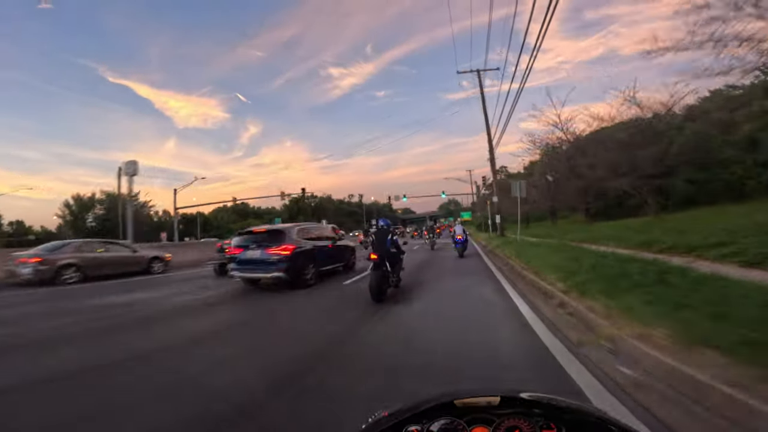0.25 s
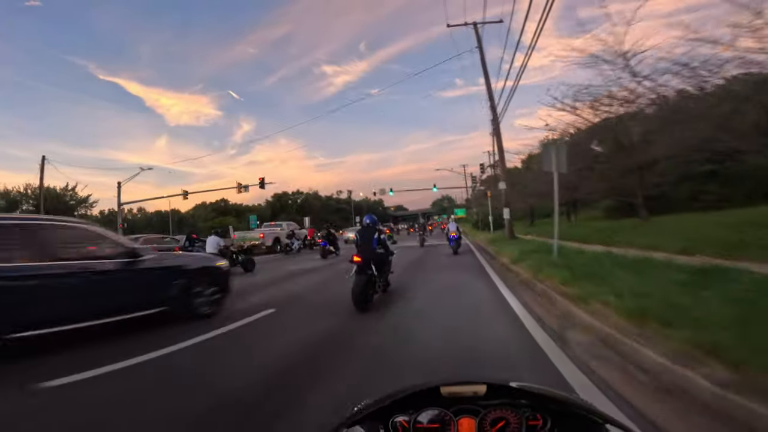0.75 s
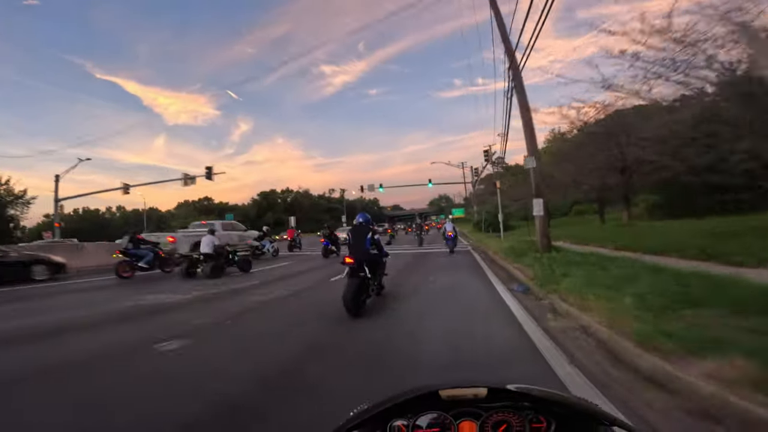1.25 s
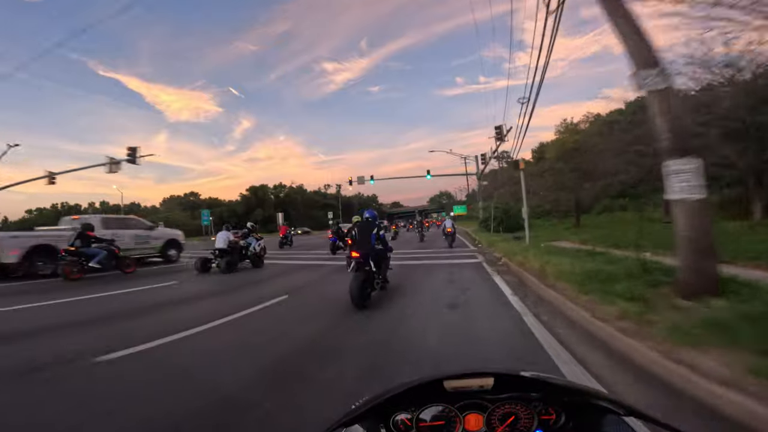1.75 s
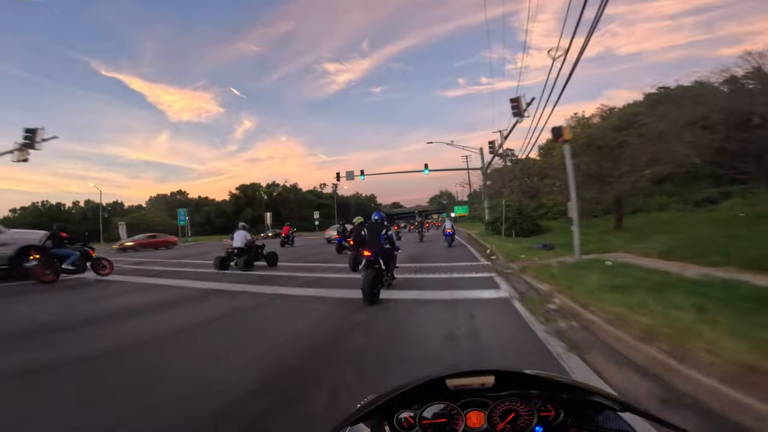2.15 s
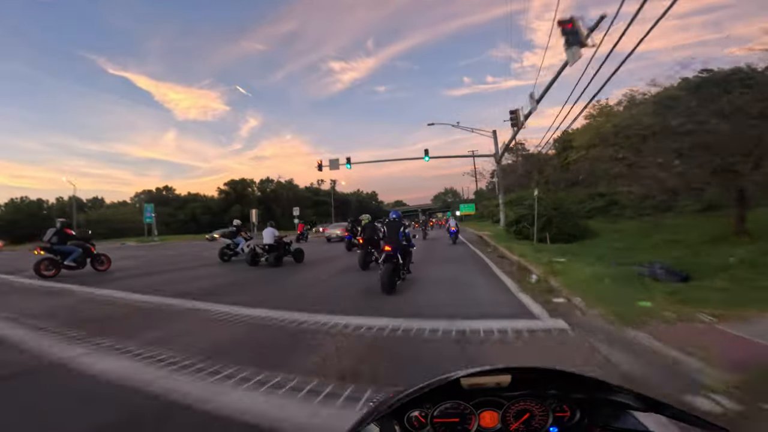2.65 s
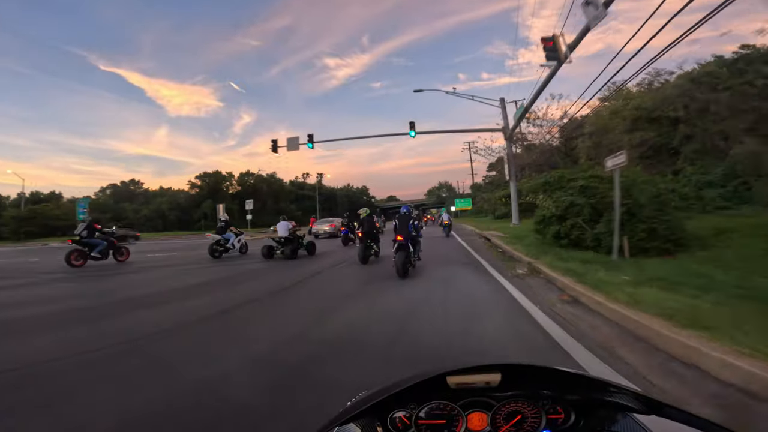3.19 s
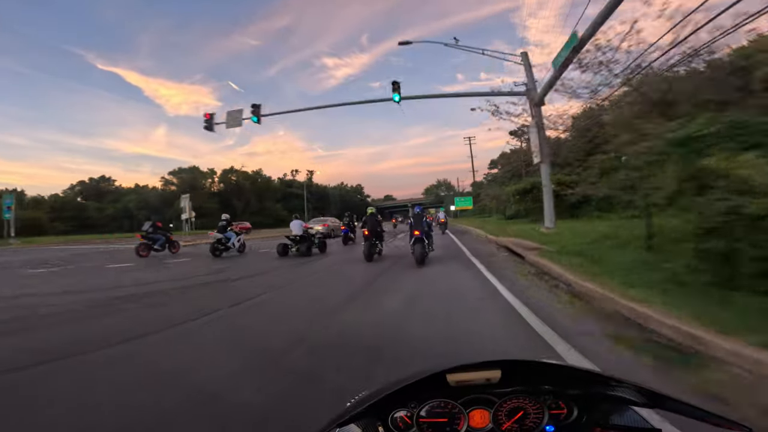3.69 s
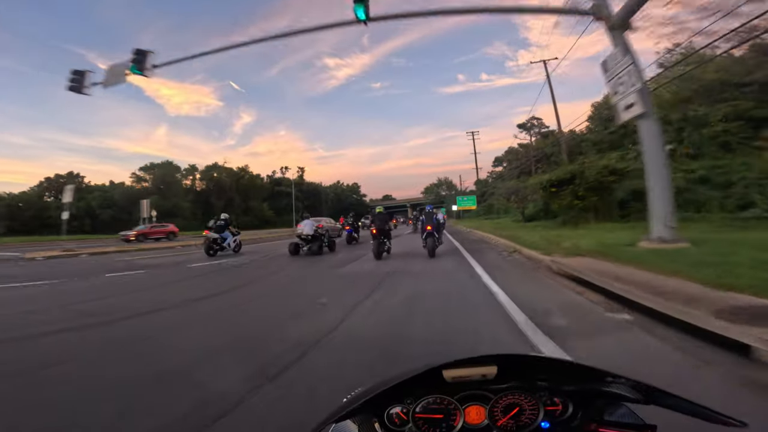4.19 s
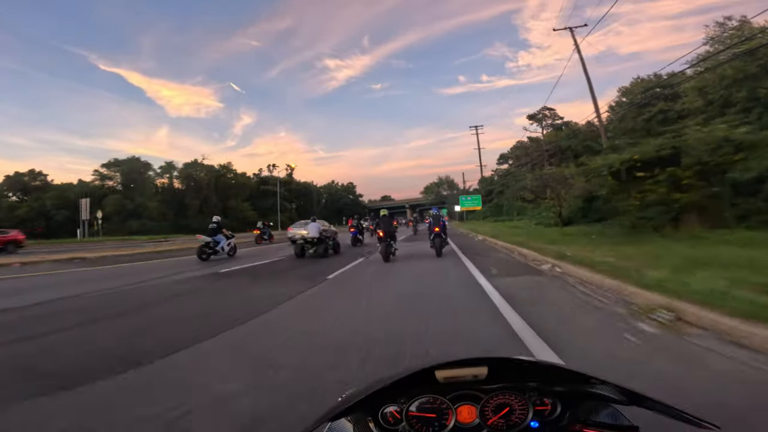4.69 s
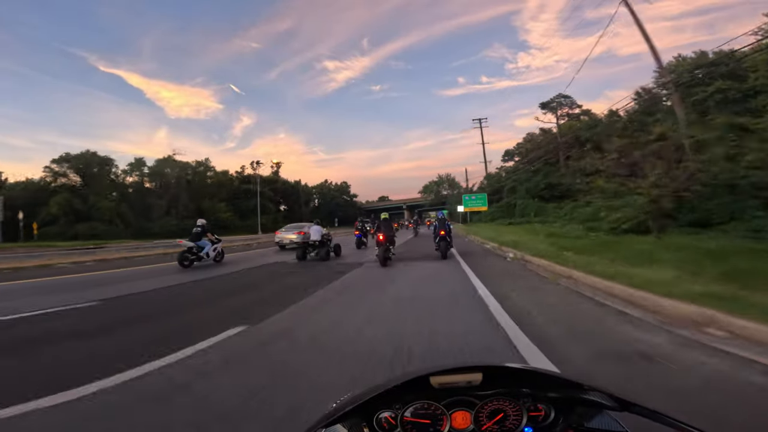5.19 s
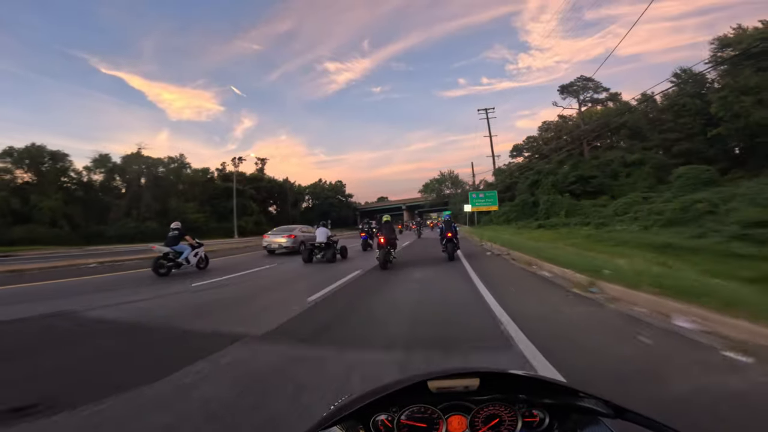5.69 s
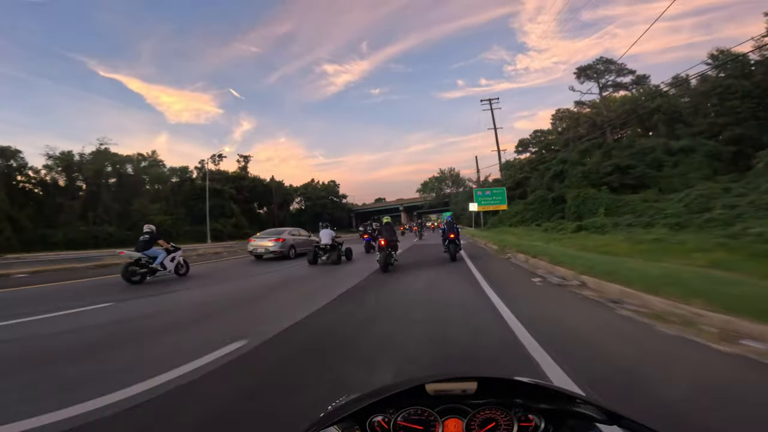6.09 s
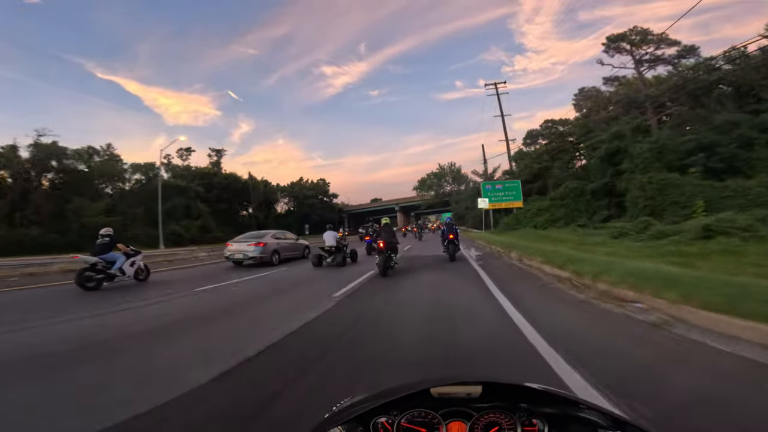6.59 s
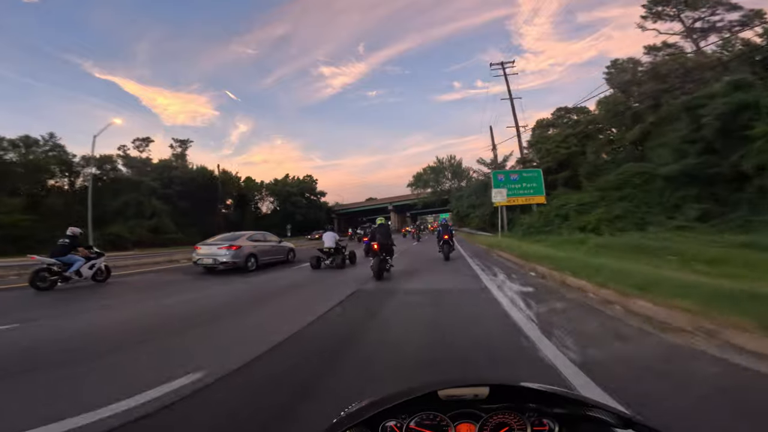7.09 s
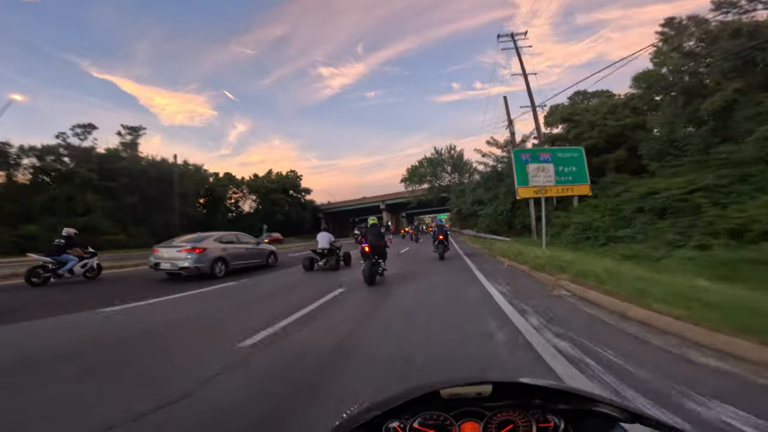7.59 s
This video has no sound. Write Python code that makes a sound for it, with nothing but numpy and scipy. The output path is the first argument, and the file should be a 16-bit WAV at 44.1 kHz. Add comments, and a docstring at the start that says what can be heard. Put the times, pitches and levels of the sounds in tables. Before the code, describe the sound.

A group of motorcycles rides through a road junction, heard from one of the bikes. Its four-cylinder engine growls upward, then settles into a steady hum and whine, with clatter and buzzing plastic panels. A nearby V-twin barks, revs up and pops as its throttle shuts. Another bike cruises alongside, and a last one winds up into a snarl. Wind, tyres and the droning pack continue underneath.

```python
"""At a road junction, a group of motorcycles speeds up, heard from one of the bikes.
The rider's four-cylinder engine hums, clatters and shakes the fairing (the plastic body panels).
A four-cylinder ahead eases off, a V-twin barks and pops, another four cruises alongside and
a last one winds up. Each exhaust note is a stack of tones at multiples of the engine's cycle rate.
Behind them are the rest of the pack, tyres and wind; a limiter holds the loudest peaks down."""
import sys
import numpy as np
from scipy import signal
from scipy.fft import rfft, irfft, next_fast_len
from scipy.io import wavfile
from scipy.ndimage import uniform_filter1d, minimum_filter1d, map_coordinates

SR = 44100
rng = np.random.default_rng(int(sys.argv[2]) if len(sys.argv) > 2 else 0)


def transcribe(signal):
    """Save signal, clipped to [-1, 1], as a 16-bit WAV file at the path in sys.argv[1]."""
    frames = np.atleast_2d(signal).T
    limited = np.clip(frames, -1, 1)
    pcm = np.round(limited * 32767).astype(np.int16)
    wavfile.write(sys.argv[1], SR, pcm)


N = 346185
TIME = np.arange(N) / SR

# Engine speeds; in one cycle every cylinder fires once: time_s, cycle_rate_hz
RIDER_SPEED = [(0,40.5), (.6,42.1), (.9,43.6), (1.4,46.3), (2,51.1), (2.5,55), (2.7,54), (3,53.8),
               (3.6,52.9), (4.1,53.15), (4.7,53.6), (5.5,55.45), (6.1,56.6), (7,55.9), (7.5,55.55),
               (7.85,55.7)]
LEAD_SPEED = [(0,30.5), (.14,30), (.27,31.5), (.5,30.5), (1,29), (1.4,27.6), (1.6,28.2), (1.78,30.8)]
TWIN_SPEED = [(1.88,28), (2,30.4), (2.15,32.1), (2.3,31.5), (2.5,27.1), (2.65,28.1), (3,31.85), (3.5,37.35),
              (4.03,42.9), (4.22,40.85), (4.55,36.4)]
CRUISER_SPEED = [(4.4,32.8), (5,34), (5.7,35.05), (6.3,36.05), (7,36.85), (7.85,37.4)]
REVVING_SPEED = [(5.9,33.2), (6.2,34.7), (6.5,36.7), (6.7,37.35), (7,39.75), (7.25,42.5), (7.5,45.5),
                 (7.85,50.2)]
# How strongly each part shakes or sounds: time_s, level_db
RIDER_VIBRATION = [(0,2), (.6,-11), (.9,1.5), (1.4,-2), (2,0), (2.5,-1), (2.9,-9), (3.6,-11.5), (4.6,-2.5),
                   (4.8,1), (5.6,3.5), (5.8,1.5), (6.2,-0.5), (7,-1.5), (7.85,-9)]
CASING_LEVEL = [(0,-58.5), (3.4,-57), (3.9,-43.5), (4.6,-52), (4.8,-46), (5.62,-44), (5.76,-49.5),
                (6.5,-53.5), (7.85,-46.5)]
TWIN_THROTTLE = [(1.88,-5), (2,-2.5), (2.15,0), (2.42,-2.5), (2.8,-1.5), (3.2,0.5), (3.6,0.5), (4.03,0.5),
                 (4.1,-19), (4.26,-1), (4.54,-3.5), (4.72,-21)]
REVVING_LEVEL = [(5.95,-6), (6.3,-3), (6.6,-1.5), (7,1), (7.3,3), (7.85,1.5)]

# The rider's exhaust tones ("orders"): cycle_rate_multiple, pulling_db, cruising_db
RIDER_ORDERS = [(2,-26,-23.5), (3,-28,-27.5), (4,-22,-21.5), (5,-19,-23), (6,-28,-26), (7,-26.5,-31.5),
                (8,-25.5,-33), (9,-28,-39.5)]
# Tones of the rider's whine and of the other exhausts: cycle_rate_multiple, level_db
WHINE_ORDERS = [(12,-37.5), (13,-34)]
LEAD_ORDERS = [(4,-17), (8,-30), (12,-37.5), (16,-33)]
TWIN_ORDERS = [(2,-31), (3,-22.5), (5,-20.5), (6,-22), (8,-22.5), (9,-31), (10,-25.5), (11,-23.5),
               (12,-30.5), (13,-29.5), (14,-29)]
CRUISER_ORDERS = [(4,-25.5), (8,-26), (9,-28.5), (12,-27), (16,-30)]
REVVING_ORDERS = [(4,-18.5), (8,-22.5), (12,-18)]
# The boom that lifts or lowers exhaust tones as their pitch moves: pitch_hz, gain_db
EXHAUST_BOOM = [(80,-3.5), (120,-0.5), (170,0), (220,1.5), (265,-2), (330,0), (410,4), (460,0), (530,-8),
                (600,-14)]

# Tone colours of the rider's engine: pitch_hz, gain_db
GROWL_TONE = [(300,-18), (405,20.5), (440,17.5), (510,-0.5), (600,9), (660,9.5), (740,4), (825,8.5),
              (900,-1.5), (1050,1), (1160,-3.5), (1300,-15), (2100,-16.5), (2700,-29.5), (3300,-36.5)]
WHINE_TONE = [(280,-30), (380,2), (500,5.5), (600,-1), (700,7.5), (790,-10), (1000,-14.5), (1600,-27.5),
              (2050,-21), (2190,-13), (2600,-28.5), (3300,-40)]
CLATTER_TONE = [(700,-31), (1300,-5.5), (1850,5.5), (2200,1), (2600,-4.5), (3000,-12), (3900,-10.5),
                (5200,-17.5), (8000,-37.5)]
CASING_TONE = [(1900,-32), (2080,-14), (2160,3.5), (2240,-5), (2300,-2), (2380,0), (2490,-14), (2580,-5),
               (2780,-32)]
# Tone colours of the shaking fairing: pitch_hz, gain_db
BUZZ_TONE = [(3500, -26.5), (5200, -6.5), (6000, -8.5), (6800, 1.5), (7600, -6.5), (8500, -9.5), (9400, -9),
             (11000, -24), (15000, -29)]
SIZZLE_TONE = [(7000, -23.5), (9500, -1.5), (11700, 2.5), (12600, -4.5), (13500, -2), (15500, -6.5)]
GRIT_TONE = [(1, 7), (250, 4), (500, -11.5), (1200, -36)]
TICK_TONE = [(2500, -12), (7000, 6), (11000, -4), (15500, -18)]
# Tone colours of the wind, the pack, the road and the hisses: pitch_hz, gain_db
WIND_TONE = [(12, -32.5), (20, -2), (70, -3.5), (110, -9.5), (140, -29.5), (240, -120)]
DRONE_TONE = [(60, -29.5), (100, -1.5), (150, -1), (210, -2.5), (290, 0), (410, -4), (490, -7.5),
              (620, -19.5), (800, -26.5), (1100, -41.5), (2000, -56)]
ROAD_TONE = [(300, -19.5), (600, 8), (900, 1.5), (1200, -4), (1600, -8.5), (2400, -24.5), (3200, -27),
             (6000, -59)]
HISS_TONE = [(1000, -27.5), (1500, 12.5), (2500, 9), (3200, -1), (3900, 2), (4400, -1.5), (5200, 1.5),
             (6200, -4.5), (8000, -10.5), (11000, -16), (15500, -28)]
SPURT_TONE = [(8500,-22), (10500,-2), (13000,0), (15500,-1)]
# Tone colours of the V-twin's exhaust: pitch_hz, gain_db
POP_TONE = [(400,-9.5), (600,1.5), (850,6.5), (1250,5), (1520,-4.5), (1850,-9), (2450,-6.5), (3100,-17.5),
            (5000,-28), (8000,-39)]
BARK_TONE = [(330,-17.5), (450,10.5), (560,4), (680,8), (800,1.5), (950,-2), (1150,-3), (1500,-11.5),
             (1850,-21.5), (2400,-17.5), (3100,-17), (5000,-37)]
GAS_TONE = [(700,-8), (1000,2), (1270,3), (1430,10), (1660,9), (1820,-5), (2350,-2), (3100,-14), (5000,-36)]
RASP_TONE = [(2000, -21), (3200, 3), (4400, 0.5), (5400, 6.5), (6500, -4), (8200, -12), (9700, -9.5),
             (11000, -28), (15000, -45)]
# Tone colours of the four that winds up: pitch_hz, gain_db
SNARL_TONE = [(550,-28), (760,3.5), (900,8), (1000,3), (1110,9), (1280,-10.5), (1450,-7.5), (1700,-14),
              (2000,-15.5), (3000,-22.5)]
BRASSY_TONE = [(1100,-14), (1300,4), (1500,1), (1720,4), (1900,-9), (2400,-15), (2900,-26)]

# Background loudness: time_s, wind_db, road_db, hiss_db, drone_db
BACKGROUND_LEVELS = [(0,-22.5,-30,-46,-15), (.6,-28,-29,-44,-15.5), (2,-22.5,-34.5,-47,-15.5),
                     (3.5,-22,-30,-49,-16), (4.2,-25.5,-39,-48,-17), (5,-24.5,-33.5,-45,-14.5),
                     (6.5,-25.5,-34.5,-44.5,-17.5), (7.85,-25,-39,-43,-16.5)]
# Brief gliding engine tones: start_s, end_s, start_hz, end_hz, level_db
SWELLS = [(-.3,1,1126,1164,-41), (0.547,1.048,495,481,-27), (.55,1.045,425,436,-25.5),
          (0.555,1.049,803,815,-34.5), (1.049,1.6,816,850,-34.5), (1.096,1.55,436,461,-19.5),
          (1.886,2.45,432,400,-35), (2.507,2.954,707,700,-32), (3.903,5.295,438.6,491,-28.5),
          (4.45,4.853,399.5,404,-21), (4.994,5.595,230.7,158.5,-20.5), (5.105,5.366,386,379.4,-17),
          (5.403,6.106,161.5,177.7,-22.5), (6.197,6.799,860,882,-37.5)]
# Spells of loose panels ringing: start_s, end_s, pitch_hz, level_db
RATTLES = [(0.851, 1.007, 7600, -65), (1.1, 1.7, 7740, -60), (1.637, 2.501, 6800, -56),
           (2.441, 2.568, 6370, -51), (4.752, 5.85, 6970, -54), (7.096, 8.006, 9394, -60.5)]
# Harder shaking of the fairing: middle_s, half_length_s, added_buzz_db, added_sizzle_db
JOLTS = [(2.15,0.39,11.5,2), (4.15,0.095,10,4), (5.6,0.11,11.5,3), (7.5,1,5.5,8.5)]
# Plastic ticks, and the V-twin's cracks and pops: time_s, level_db
TICKS = [(1.7246,-36), (1.8068,-37), (2.0439,-42), (2.1033,-47.5), (2.1598,-39), (2.2741,-38), (2.3477,-40),
         (5.3812,-40), (5.525,-47.5), (5.5787,-42)]
POPS = [(1.806, -19), (1.9056, -25), (1.947, -24), (2.042, -23), (2.103, -27), (2.274, -17), (2.3246, -25),
        (2.389, -19), (2.46, -17), (2.5825, -24), (2.688, -19), (2.7583, -16), (2.976, -22), (3.188, -21),
        (4.282, -19), (4.3064, -21), (4.41, -18), (4.4788, -28), (4.489, -15.5), (4.6263, -15),
        (4.654, -17), (4.6707, -20)]
# Spurts of high hiss: middle_s, half_length_s, level_db
SPURTS = [(4.09,.016,-60), (4.15,.028,-62)]
# Surges of the snarl: middle_s, half_length_s, added_snarl_db, brassy_db
SURGES = [(7.02,0.09,6.5,-53), (7.65,0.14,-2.5,-38)]

CRUISE_S, SETTLE_S = 2.7, 0.36  # when the rider stops speeding up, and how long that takes
WHINE_S, WHINE_RISE_S = 2.78, 2  # when the whine comes through, and how long that takes
GROWL_DB, GROWL_DROP_DB = -26.5, 11  # growl while pulling; how far it drops at a cruise
WHINE_DB, WHINE_DROP_DB = -31, 13  # whine at a cruise; how much quieter it is before
HUM_FOLLOWS, WHINE_FOLLOWS, FAIRING_FOLLOWS = 0.37, 0.12, 0.76  # dB per dB of vibration
CLATTER_DB, BUZZ_DB, SIZZLE_DB = -43, -62, -70
TWIN_HARSH_HZ = 33.7  # the V-twin turns harsh above this cycle rate
TWIN_SHUT_S, SHUT_TAKES_S = 4.04, 0.03  # when and how fast its throttle snaps shut
BARK_DB, THROB_FOLLOWS = -25.5, 0.18  # pipe pulses; dB of throb per dB of throttle
GAS_DB, GAS_DB_PER_HZ, GAS_DROP_DB = -41, 1, 4  # at low revs; growth with revs; drop once shut
RASP_DB, RASP_DB_PER_HZ, RASP_DROP_DB = -55, 0.69, 22  # likewise
SNARL_MID_HZ, SNARL_DB, SNARL_DB_PER_HZ = 39, -40.5, 0.93  # a cycle rate; snarl there; growth with revs


def amp(db):
    """Turn decibels into a multiplier."""
    return 10 ** (np.asarray(db) / 20)


def unit(x):
    """Scale x to an average strength (rms) of 1."""
    return x / np.sqrt(np.mean(x ** 2) + 1e-20)


def noise():
    """White noise: an even hiss."""
    return rng.standard_normal(N)


def curves(rows):
    """Join a table's points with lines: one curve for each column after the time."""
    times, *columns = np.transpose(rows)
    return [np.interp(TIME, times, column) for column in columns]


def ramp(at, length):
    """Rise from 0 to 1 around a moment."""
    return np.clip((TIME - at) / length + .5, 0, 1)


def arch(start, end):
    """Rise from 0 to 1 and fall back between two moments."""
    return np.sin(np.pi * np.clip((TIME - start) / (end - start), 0, 1))


def humps(rows):
    """A bell shape for each (middle, half length, heights) row: one curve per height column."""
    return sum(np.outer(heights, np.exp(-((TIME - s) / half) ** 2)) for s, half, *heights in rows)


def present(rows, fade_s):
    """1 from a table's first time to its last, fading to 0 outside."""
    start, end = rows[0][0], rows[-1][0]
    return np.interp(TIME, [start - fade_s, start, end, end + fade_s], [0, 1, 1, 0])


def wobble(rate):
    """A smooth random curve through `rate` new values a second."""
    knots = rng.standard_normal(int(N * rate / SR) + 4)
    coarse = TIME[::32]
    return np.interp(TIME, coarse, map_coordinates(knots, [coarse * rate], mode="nearest"))


def colour(x, points):
    """Filter x to a tone colour, then scale it to strength 1."""
    size = next_fast_len(N + 8192)
    hz, db = np.transpose(points)
    log_hz = np.log(np.fft.rfftfreq(size, 1 / SR) + 1)
    gain = amp(np.interp(log_hz, np.log(hz), db, left=-120, right=-120))
    return unit(irfft(rfft(x, size) * gain, size)[:N])


def cycles(rate, waver):
    """Count the engine cycles run so far, at a slightly unsteady speed."""
    return np.cumsum(rate * (1 + waver * wobble(12))) / SR


def tone(turns, order, db, rough):
    """One engine tone; uneven burning shakes its loudness and timing."""
    phase = 2 * np.pi * (order * turns + rng.random()) + rough * wobble(35)
    return np.sqrt(2) * amp(db) * (1 + rough * wobble(35)) * np.sin(phase)


def bursts(turns, rate, offset, decay_s, scatter_db):
    """A loudness curve that jumps once a cycle, each time to a new height, and dies away."""
    whole, part = np.divmod(turns + 1 - offset, 1)
    heights = amp(scatter_db * np.clip(rng.standard_normal(2048), -2, 2))
    return heights[whole.astype(int) % len(heights)] * np.exp(-part / rate / decay_s)


def rises(x):
    """Keep only the upward steps of x, as sharp clicks."""
    return np.maximum(np.diff(x, prepend=x[0]), 0)


def repeating(turns, count, jitter):
    """The same ragged pressure wave in every cycle, made of `count` nearly equal tones."""
    tones = amp(rng.normal(0, 1.5, count)) * np.exp(2j * np.pi * rng.random(count))
    wave = irfft(np.append(0, tones), 4096)
    place = (turns + jitter * wobble(60)) % 1
    return unit(np.interp(place, np.linspace(0, 1, len(wave)), wave))


def exhaust(turns, rate, orders, rough):
    """An engine's low tones, each swelling as its pitch passes through the boom."""
    boom_hz, boom_db = np.transpose(EXHAUST_BOOM)
    out = np.zeros(N)
    for order, db in orders:
        lift_db = np.interp(order * rate, boom_hz, boom_db)
        drift_db = 0.7 * wobble(3.15)  # the bikes shift about
        out += tone(turns, round(order), db + lift_db + drift_db, rough)
    return out


def rider():
    """The rider's engine hums and growls, then whines; valves clatter and the fairing buzzes."""
    rate, vibration_db = curves(RIDER_SPEED) + curves(RIDER_VIBRATION)
    cruise = ramp(CRUISE_S, SETTLE_S)
    turns = cycles(rate, waver=0.001002)
    orders = [(k, pulling + cruise * (cruising - pulling)) for k, pulling, cruising in RIDER_ORDERS]
    hum = amp(HUM_FOLLOWS * vibration_db) * exhaust(turns, rate, orders, rough=0.1)
    upper = growl_and_whine(turns, cruise, vibration_db)
    knock = bursts(turns, rate, 0, decay_s=.001, scatter_db=1.5)
    rebound = .85 - .5 * cruise  # the second knock is stronger while pulling
    knock += rebound * bursts(turns, rate, 1 / 4, decay_s=.0015, scatter_db=2)
    valves = repeating(turns, count=140, jitter=0.00037) + 0.75 * noise()  # much alike in every cycle
    clatter = amp(CLATTER_DB + vibration_db) * colour((knock + 0.1) * valves, CLATTER_TONE)
    shake = uniform_filter1d(knock, size=45)  # plastic answers with a softer edge
    return hum + upper + clatter + fairing(shake, vibration_db) + casing(turns, rate) + rattles(shake)


def growl_and_whine(turns, cruise, vibration_db):
    """The rider's higher engine tones: a growl while pulling gives way to a whine at a cruise."""
    wave = repeating(turns, count=80, jitter=.0025)
    # an echo off the road, its path shifting, makes the overtones come and go
    echo = np.interp(TIME - .006 - .0005 * wobble(3), TIME, wave)
    growl_db = GROWL_DB - GROWL_DROP_DB * cruise + 1.2 * wobble(5.3)
    growl = amp(growl_db) * colour(wave + .7 * echo, GROWL_TONE)
    follow_db = WHINE_FOLLOWS * vibration_db
    whine = amp(WHINE_DB) * colour(wave, WHINE_TONE)
    for order, db in WHINE_ORDERS:
        whine += tone(turns, round(order), db + follow_db + 2.32 * wobble(4), rough=0.29)
    drop_db = WHINE_DROP_DB * (1 - ramp(WHINE_S, WHINE_RISE_S))
    return growl + amp(follow_db - drop_db + 0.93 * wobble(7.7)) * whine


def fairing(shake, vibration_db):
    """The plastic panels buzz and sizzle as the engine's knocks shake them."""
    buzz_db, sizzle_db = humps(JOLTS) + FAIRING_FOLLOWS * vibration_db + 1.9 * wobble(4.3)
    buzz = amp(BUZZ_DB + buzz_db) * colour((shake + .04) * noise(), BUZZ_TONE)
    sizzle = amp(SIZZLE_DB + sizzle_db) * colour((shake + .12) * noise(), SIZZLE_TONE)
    return buzz + sizzle


def casing(turns, rate):
    """Valve parts knock and scrape on the engine casing once a cycle; its ringing blurs into a whine."""
    level_db, = curves(CASING_LEVEL)
    blows = bursts(turns, rate, 0, decay_s=0.0058, scatter_db=1.5)
    scrape = .6 * unit((blows + .2) * noise())
    return amp(level_db + 1.5 * wobble(9)) * colour(unit(rises(blows)) + scrape, CASING_TONE)


def lead_four():
    """A four-cylinder ahead drones as its throttle closes."""
    rate, = curves(LEAD_SPEED)
    turns = cycles(rate, waver=0.0014)
    return present(LEAD_SPEED, fade_s=0.11) * exhaust(turns, rate, LEAD_ORDERS, rough=0.091)


def pack(count):
    """Farther engines, each firing at its own drifting speed, blend into a drone."""
    firings = np.zeros(N)
    for _ in range(count):
        rate = rng.uniform(30, 55) * np.exp(.09 * wobble(.8))
        turns = cycles(rate, waver=0.00408)
        for cylinder in range(4):
            puff = bursts(turns, rate, cylinder / 4, decay_s=.002, scatter_db=5.0)
            firings += rng.uniform(0.066, 1) * rises(puff)
    return colour(unit(firings) + .5 * noise(), DRONE_TONE)


def surroundings():
    """Wind on the microphone, the pack's drone, and the roar and hiss of tyres and air."""
    wind_db, road_db, hiss_db, drone_db = curves(BACKGROUND_LEVELS)
    wind = amp(wind_db + 1.8 * wobble(8.8)) * colour(noise(), WIND_TONE)
    road = amp(road_db + 1.4 * wobble(12)) * colour(noise(), ROAD_TONE)
    hiss = amp(hiss_db + 1.4 * wobble(7.9)) * colour(noise(), HISS_TONE)
    return wind + amp(drone_db) * pack(count=5) + road + hiss


def swells():
    """Gliding engine tones stand out for a moment, from the rider's bike or others."""
    out = np.zeros(N)
    for start, end, from_hz, to_hz, db in SWELLS:
        turns = cycles(np.interp(TIME, [start, end], [from_hz, to_hz]), waver=0.00473)
        out += arch(start, end) * tone(turns, 1, db, rough=0.065)
    return out


def rattles(shake):
    """Loose panels, struck in every engine cycle, ring in spells around one high pitch each."""
    grit = colour(shake * noise(), GRIT_TONE)
    out = np.zeros(N)
    for start, end, hz, db in RATTLES:
        spell = np.sqrt(np.abs(arch(start, end)))
        out += amp(db) * spell * grit * np.sin(2 * np.pi * hz * TIME)
    return out


def ticks(trim_db=-1, decay_s=0.0012):
    """Single hard taps in the fairing, each a tiny burst of bright noise."""
    loudness = np.zeros(N)
    t = np.arange(SR // 100) / SR
    for s, db in TICKS:
        loudness[round(s * SR):][:len(t)] += amp(db + trim_db) * np.exp(-t / decay_s)
    return loudness * colour(noise(), TICK_TONE)


def pops(trim_db=-3, decay_s=0.0036):
    """The V-twin's pipe cracks: hard firings as it pulls, then pops once the throttle shuts."""
    loudness = np.zeros(N)
    for s, db in POPS:
        loudness += amp(db + trim_db) * ramp(s, .0012) * np.exp(-np.abs(TIME - s) / decay_s)
    return loudness * colour(noise(), POP_TONE)


def v_twin():
    """Two cylinders fire at uneven gaps, each with a bark and a puff of gas, harsher as revs climb."""
    rate, throttle_db = curves(TWIN_SPEED) + curves(TWIN_THROTTLE)
    turns = cycles(rate, waver=0.00069)
    extra_hz = np.maximum(rate - TWIN_HARSH_HZ, 0)
    shut = ramp(TWIN_SHUT_S, SHUT_TAKES_S)
    throb = amp(THROB_FOLLOWS * throttle_db) * exhaust(turns, rate, TWIN_ORDERS, rough=0.04)
    fired = turns + 0.0025 * wobble(70)  # no two firings are timed alike
    puffs = 0.8 * bursts(fired, rate, 0, decay_s=.0028, scatter_db=1)
    puffs += bursts(fired, rate, 3 / 8, decay_s=.0024, scatter_db=1)
    # the pipe smears each pulse into a 5 ms falling sweep
    sweep = signal.chirp(np.arange(SR // 200) / SR, 3000, 1 / 200, 200, "logarithmic")
    bark = amp(BARK_DB) * colour(signal.fftconvolve(rises(puffs), sweep)[:N], BARK_TONE)
    flow = repeating(turns, count=120, jitter=.0008) + .7 * noise()
    gas = amp(GAS_DB + GAS_DB_PER_HZ * extra_hz - GAS_DROP_DB * shut) * colour(puffs * flow, GAS_TONE)
    rasp_db = RASP_DB + RASP_DB_PER_HZ * extra_hz - RASP_DROP_DB * shut
    rasp = amp(rasp_db) * colour(puffs * noise(), RASP_TONE)
    return present(TWIN_THROTTLE, fade_s=0.058) * (throb + amp(throttle_db) * (bark + gas + rasp))


def high_hiss():
    """A brief, very high hiss in two spurts."""
    spurts, = humps([(s, half, amp(db)) for s, half, db in SPURTS])
    return spurts * colour(noise(), SPURT_TONE)


def cruising_four():
    """A four-cylinder alongside gains speed gently in a high gear."""
    rate, = curves(CRUISER_SPEED)
    turns = cycles(rate, waver=0.0016)
    return present(CRUISER_SPEED, fade_s=0.26) * exhaust(turns, rate, CRUISER_ORDERS, rough=0.12)


def revving_four():
    """Another four-cylinder winds up into a ragged snarl that turns brassy as it surges."""
    rate, level_db = curves(REVVING_SPEED) + curves(REVVING_LEVEL)
    turns = cycles(rate, waver=0.00289)
    note = amp(level_db) * exhaust(turns, rate, REVVING_ORDERS, rough=0.26)
    surge_db, brass = humps([(s, half, db, amp(brassy_db)) for s, half, db, brassy_db in SURGES])
    snarl_db = SNARL_DB + level_db + SNARL_DB_PER_HZ * (rate - SNARL_MID_HZ) + surge_db
    # one wave each firing, and a weaker one each cycle from the unequal cylinders
    waves = repeating(4 * turns, count=18, jitter=.015) + .65 * repeating(turns, count=72, jitter=.004)
    snarl = amp(snarl_db + 2.3 * wobble(22)) * colour(waves, SNARL_TONE)
    return present(REVVING_LEVEL, fade_s=0.2) * (note + snarl + brass * colour(waves, BRASSY_TONE))


def scene():
    """All the engines, the shaking fairing, the road and the wind at one microphone."""
    near = rider() + ticks() + high_hiss() + v_twin() + pops()
    return (near + lead_four() + cruising_four() + revving_four() + swells() + surroundings())[None]


def record(dry, ceiling=0.91, cutoff_hz=16300):
    """A fast limiter turns the peaks down, the end fades quickly and the highest treble is cut."""
    needed_gain = np.minimum(1, ceiling / (np.abs(dry) + 1e-9))
    held_gain = minimum_filter1d(needed_gain, size=500)
    gain = uniform_filter1d(uniform_filter1d(held_gain, size=250), size=250)
    fade_out = np.minimum(1, (TIME[-1] - TIME) / .004)
    treble_cut = signal.cheby2(16, 60, cutoff_hz, fs=SR, output="sos")
    return signal.sosfiltfilt(treble_cut, dry * gain * fade_out, padlen=500)


dry = scene()
out = record(dry)
transcribe(out)
```